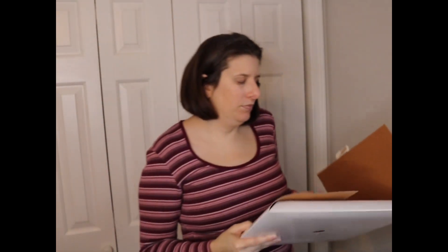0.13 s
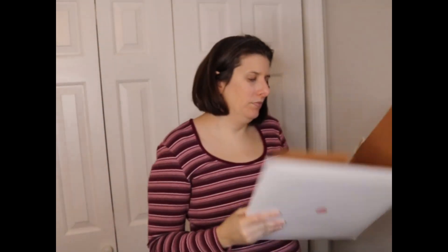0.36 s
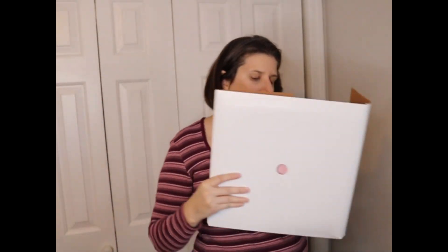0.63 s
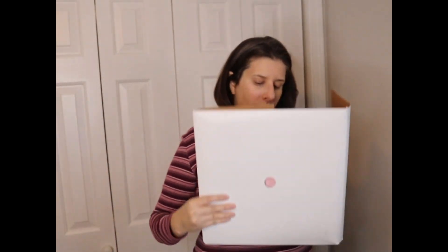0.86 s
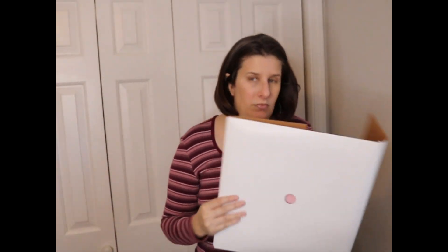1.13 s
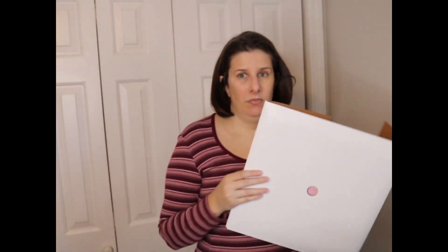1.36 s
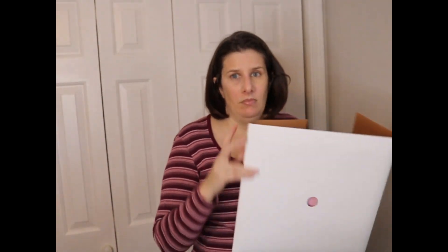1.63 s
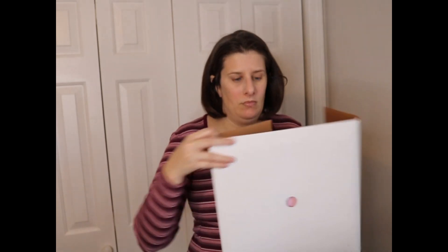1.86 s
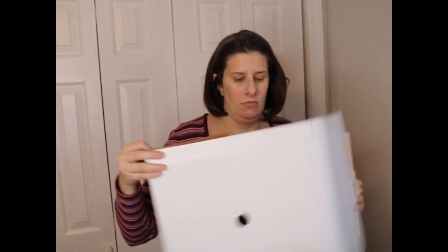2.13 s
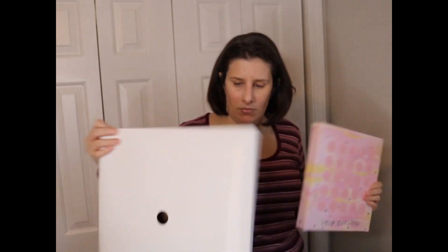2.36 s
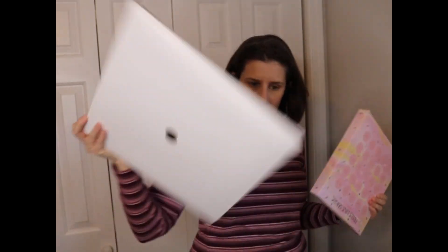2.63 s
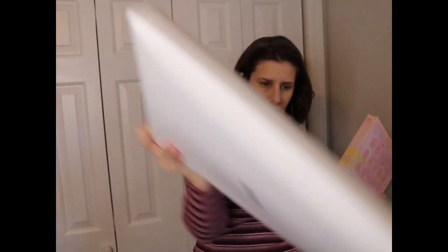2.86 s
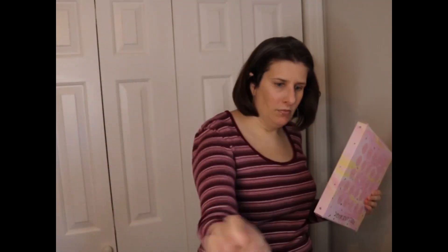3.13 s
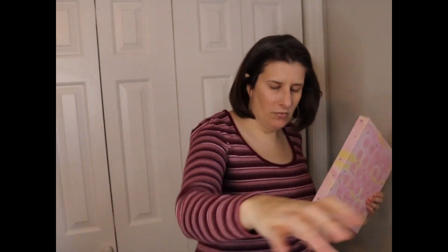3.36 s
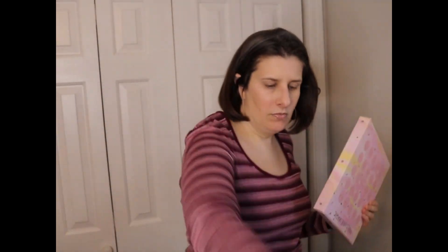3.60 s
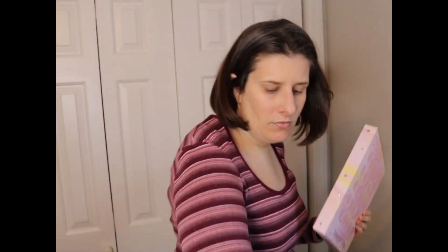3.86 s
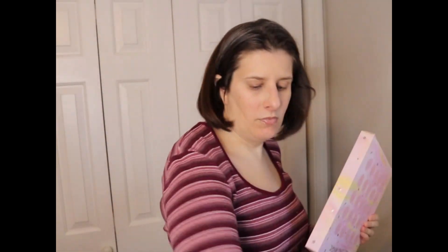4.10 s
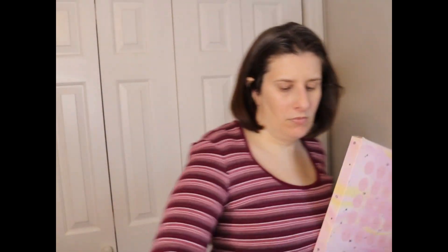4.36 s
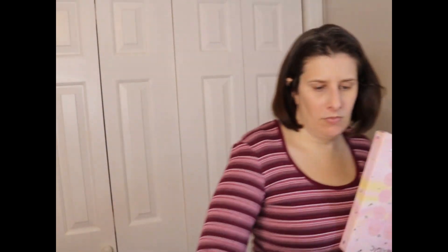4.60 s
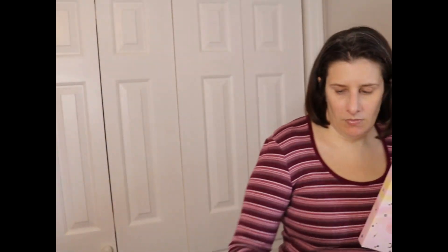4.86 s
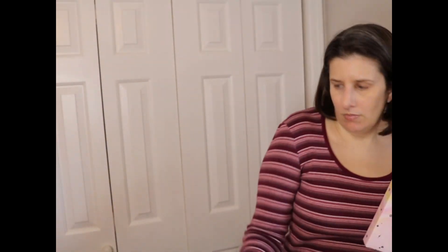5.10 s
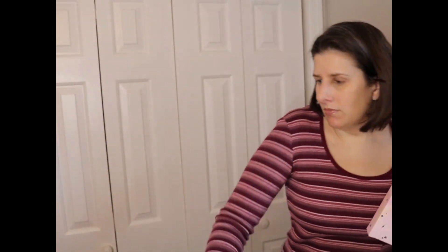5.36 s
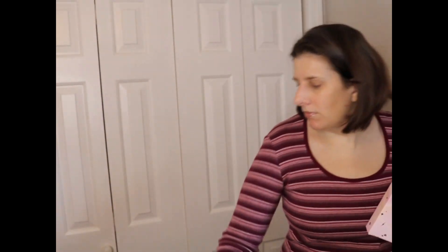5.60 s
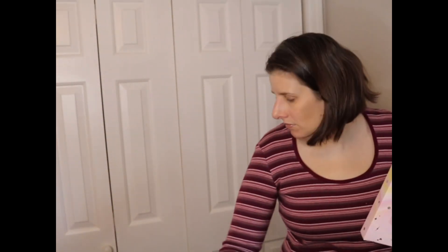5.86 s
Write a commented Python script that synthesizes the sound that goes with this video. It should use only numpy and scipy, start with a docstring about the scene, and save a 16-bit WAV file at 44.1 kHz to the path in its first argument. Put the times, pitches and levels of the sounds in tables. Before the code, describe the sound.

Stiff cardboard slides and scrapes indoors, a boxed set slipping from its sleeve, then hard hollow knocks and low thumps as the pile is shifted.

```python
"""Unpacking a boxed set

Indoors, a boxed set is slid out of a corrugated sleeve, the sleeve is dropped on a pile and the pile is shifted.
Board rubs on board in random stick-slip grains, and filtered noise makes the paper scrape and film hiss.
Flaps and corners knock: short pulses ring the panels and the hollow. Slow slips make the floor boom.
It is heard in a small room, equally loud on both sides, with the phase between them shifted in patches."""
import sys
import numpy as np
from scipy import signal
from scipy.fft import rfft, irfft
from scipy.io import wavfile
from scipy.ndimage import uniform_filter1d

SR = 44100
rng = np.random.default_rng(int(sys.argv[2]) if len(sys.argv) > 2 else 0)


def field_ratio(decibels):
    """Amplitude ratio for a level in dB (20 dB per decade); scalars and array-likes work."""
    return 10 ** (np.asarray(decibels, dtype=float) / 20)


def store_wav(level_fs):
    """Save 16-bit WAV to argv[1]."""
    pcm = np.round(np.clip(np.atleast_2d(level_fs), -1, 1) * 32767)
    wavfile.write(sys.argv[1], SR, pcm.T.astype(np.int16))


N = 263718  # length in samples

# knocks, peak levels before the room: time_s, panels_db, thud_db, crack_db, pitch_hz (of the struck panel)
KNOCK_EVENTS = [(0.121, -34, -44, -31, 1090), (0.171, -35.5, -56, -30, 1320),
                (0.307, -18.5, -36, -20.5, 650), (0.399, -23, -38.5, -27, 640), (0.467, -45, -50, -25, 880),
                (0.551, -22, -36, -32, 684), (0.847, -35, -48, -41, 860), (1.26, -28.5, -41, -26, 770.0),
                (1.361, -16.5, -36, -25.5, 745), (1.92, -22.5, -59, -25, 930.0),
                (1.943, -21.5, -40, -52, 377), (1.965, -19, -28, -29, 1170), (2.172, -26.5, -53, -44, 635),
                (2.194, -18.5, -52, -27, 670), (2.24, -19, -30, -24.5, 910), (2.283, -20, -57, -26, 930),
                (2.353, -24, -25.5, -84, 241), (2.529, -39, -35.5, -46, 430), (2.837, -29, -74, -36.5, 880),
                (3.033, -14.5, -15, -28, 318), (3.067, -14, -53, -55, 990), (3.099, -20.5, -25, -30, 514),
                (3.154, -17.5, -17, -29.5, 510), (3.652, -34.5, -47, -32, 930),
                (3.717, -13, -25.5, -14.5, 623), (3.731, -20, -14.5, -18.5, 670),
                (4.41, -14.5, -21, -24, 593), (4.425, -24, -25, -24, 560), (4.512, -14, -17, -39, 420),
                (5.237, -30, -38.5, -38.5, 935), (5.506, -27, -30.5, -25, 770), (5.707, -26, -20, -44, 270),
                (5.749, -26, -23, -37, 820), (5.778, -26, -26, -28, 1230), (5.814, -22.5, -34, -30, 845)]
# loudness of the floor's boom, with straight lines between rows: time_s, level_db
BOOM_LEVEL = [(0.0, -55.5), (1.863, -87), (1.985, -53.5), (2.386, -45.5), (2.891, -55.5), (3.082, -45.5),
              (3.675, -48.5), (3.93, -28.5), (4.301, -44), (4.458, -28.5), (4.702, -38.5), (4.86, -30),
              (5.207, -48), (5.764, -41), (5.98, -40.5)]
# resonances of the cardboard panels, lowest first: pitch_hz, level_db (relative), t60_s (time to fall 60 dB)
BOARD_MODES = [(249.8, 4, 0.063), (306, 4.5, 0.048), (382.2, 4.5, 0.081), (447.4, 1, 0.041),
               (563, 4, 0.028), (667, 7.5, 0.0077), (770, 7.5, 0.017), (930, 4.5, 0.012), (1134, 6, 0.017),
               (1325, 3.5, 0.0082), (1529, 8.5, 0.0057)]
# resonances of floor and furniture, lowest first: pitch_hz, level_db (relative), t60_s
FLOOR_MODES = [(29.8, -2.5, 0.22), (42.2, 3.5, 0.31), (60, -3, 0.4), (74.7, -3.5, 0.078),
               (113.2, -1.5, 0.13), (165.8, 0, 0.09)]
# tone colour of paper surfaces scraping: frequency_hz, level_db (relative, per Hz)
SCRAPE_COLOUR = [(1200, 10.5), (1900, 0.5), (2700, 2), (4000, -0.5), (5300, -7), (6500, -16)]
# tone colour of hissing plastic film: frequency_hz, level_db (relative, per Hz)
FILM_COLOUR = [(4500, -4), (7000, -7.5), (11000, -9.5), (16000, -18.5)]
# tone colour of the still air: frequency_hz, level_db (relative, per Hz)
AIR_COLOUR = [(25, 7.5), (350, -2), (1050, 1.5), (1800, -11), (4000, -11.5), (16000, -20)]
# phase of left against right, held until the next row:
# start_s, bass_eighth_turns, crossing_hz, upper_eighth_turns (above the crossing)
SIDE_PHASE = [(0.0, -2, 800, 0), (0.28, 2, 950, -3), (1.0, 0, 1600, -3.5), (1.75, 0.5, 1400, 6),
              (2.6, 1, 600, 8), (2.98, 1, 660, 7), (3.17, 1, 500, 7), (3.62, 2.3, 1500, -1.5),
              (4.5, 2, 1000, -.5), (5.1, 2, 330, 7.6), (5.42, -.6, 1900, 8)]
# strokes of board on board:
# start_s, length_s, panels_db, weight_db (hollow sleeve against panels), speed_db (faster sliding scrapes more)
RUB_STROKES = [(-0.03, 0.21, -49.5, -7, 11), (0.409, 0.046, -35.5, -9, 6.5), (0.522, 0.065, -40.5, -3, 7.5),
               (0.615, 0.18, -48, -8, 5), (0.816, 0.042, -43, -9.5, 7.5), (1.035, 0.38, -47.5, -9, 8.5),
               (1.197, 0.086, -39.5, -16, 6), (1.483, 0.31, -54.5, -11.5, 9.5),
               (1.823, 0.17, -49.5, -13, 7), (1.93, 0.2, -35.5, -10.5, 1.5), (2.145, 0.032, -32, -7.5, 3.5),
               (2.227, 0.038, -35, -17, 2), (2.468, 0.21, -49, -10.5, 4), (2.771, 0.012, -41.5, -3.5, 3.5),
               (3.005, 0.27, -44.5, -3.5, 2.5), (3.174, 0.051, -45, 12.5, 11.5), (3.72, 0.2, -38, 2, 6.5),
               (3.871, 0.075, -33.5, 4.5, 7.5), (4.03, 0.076, -47.5, 13, 8), (4.15, 0.093, -44.5, -1, 10.5),
               (4.312, 0.08, -46, 0, 7.5), (4.428, 0.055, -43.5, -8, -1.5), (4.523, 0.06, -45, -9, 4),
               (4.578, 0.24, -50.5, 0.5, 9.5), (4.77, 0.15, -49, 0.5, -0.5), (4.87, 0.41, -53.5, -4.5, 8.5),
               (5.251, 0.4, -52.5, -5, 2.5), (5.472, 0.056, -42.5, -1.5, 6.5),
               (5.775, 0.051, -40, -1.5, -1)]
# film hiss against the scrape, mostly more of it once the wrapped box is out: time_s, share_db
FILM_AGAINST_SCRAPE = [(0, -12.5), (3.0, -8.5), (3.6, -28), (3.72, -6), (4.6, -6), (5.5, -1), (5.75, -8)]


def level(x, db=0):
    """Scale a sound to an rms level in dB."""
    return x * field_ratio(db) / np.sqrt(np.mean(x ** 2))


def colour(x, points):
    """Shape the spectrum by (Hz, dB) points, falling away steeply outside them."""
    hz, db = np.transpose(points)
    log_hz = np.log(np.arange(len(x) // 2 + 1) * SR / len(x) + 1)
    below = np.maximum(np.log(hz[0]) - log_hz, 0)
    above = np.maximum(log_hz - np.log(hz[-1]), 0)
    gain_db = np.interp(log_hz, np.log(hz), db) - 47 * (below + above)
    return irfft(rfft(x) * field_ratio(gain_db), len(x))


def mode(x, hz, t60):
    """One resonance; its gain on noise does not depend on how long it rings."""
    r = np.exp(-np.log(1000) / (t60 * SR))
    feedback = [1, -2 * r * np.cos(2 * np.pi * hz / SR), r * r]
    return np.sqrt(1 - r * r) * signal.lfilter([1, 0, -1], feedback, x)


def ring(x, modes):
    """Let all the resonances of a body ring together, alternating in sign."""
    return sum((-1) ** k * field_ratio(db) * mode(x, hz, t60) for k, (hz, db, t60) in enumerate(modes))


def curve(table):
    """A (seconds, dB) table as a gain for every sample."""
    s, db = np.transpose(table)
    return field_ratio(np.interp(np.arange(N) / SR, s, db))


def slips(per_s, spread_db, smooth, flicker_db, flicker_hz):
    """Stick-slip: random slips of uneven size over smooth sliding, with a random flicker in level."""
    when, sign, size = rng.random((3, N))
    size_db = np.minimum(-spread_db * np.log(1 - size), 12)
    grains = (when < per_s / SR) * np.sign(sign - .5) * field_ratio(size_db)
    hold = int(SR / flicker_hz)
    steps = np.repeat(rng.standard_normal(N // hold + 1), hold)
    flicker = uniform_filter1d(steps, hold)[:N]
    return (level(grains) + smooth * rng.standard_normal(N)) * field_ratio(flicker_db * flicker)


def strokes():
    """Gains of hollow, panels, scrape and film: each stroke swells, holds and dies away; their powers add."""
    attack_s, release_db_per_s = 0.019, 181
    scrape_db = -8.5  # paper scrape against the panels, before the sliding speed
    t, power = np.arange(0, N, 64) / SR, 0
    for s, length_s, db, weight_db, speed_db in RUB_STROKES:
        swell = np.clip((t - s) / attack_s, 0, 1)
        shape = swell * field_ratio(db - release_db_per_s * np.maximum(t - s - length_s, 0))
        balance = field_ratio(np.array([weight_db, 0, scrape_db + speed_db]))
        power = power + np.outer(balance, shape) ** 2
    hollow, panels, scrape = (np.interp(np.arange(N) / SR, t, g) for g in np.sqrt(power))
    return hollow, panels, scrape, scrape * curve(FILM_AGAINST_SCRAPE)


def handling():
    """One sliding contact drives hollow, panels and part of the scrape; finer slips add to the scrape and hiss."""
    hollow, panels, scrape, film = strokes()
    contact = slips(300., spread_db=6., smooth=.5, flicker_db=3.5, flicker_hz=50.)
    fine, fizz = (slips(1500., spread_db=3.5, smooth=0.7, flicker_db=2.5, flicker_hz=30.) for _ in range(2))
    hollow_sound = hollow * level(ring(contact, FLOOR_MODES[4:] + BOARD_MODES[:3]))
    panel_sound = panels * level(ring(contact, BOARD_MODES[3:]))
    scrape_sound = scrape * level(colour(0.56 * contact + fine, SCRAPE_COLOUR))
    film_sound = film * level(colour(fizz, FILM_COLOUR))
    return hollow_sound + panel_sound + scrape_sound + film_sound


def boom():
    """Shifting weight sets the floor's lowest resonances going."""
    steps = slips(60., spread_db=2.5, smooth=.8, flicker_db=1.5, flicker_hz=8.)
    return curve(BOOM_LEVEL) * level(ring(steps, FLOOR_MODES[:4]))


def still_air():
    """The quiet background of the room: steady noise, strongest in the bass."""
    return level(colour(rng.standard_normal(N), AIR_COLOUR), -58)


def knocks():
    """A tap and dying rattle: panels near its pitch ring most, the surface cracks, the hollow thuds."""
    size = 16384
    out = np.zeros(N + size)
    t = np.arange(size) / SR
    # soft board crushes before it bears, then the flaps chatter on
    crush = (t / 0.003) ** 1.4 * np.exp(-t / 0.0036)
    chatter = 0.15 * (1 - np.exp(-t / 0.003)) * np.exp(-t / 0.025)
    # shut in air lets the hollow ring on longer than when it is rubbed
    hollow = [(hz, db, 1.3 * t60) for hz, db, t60 in FLOOR_MODES[3:] + BOARD_MODES[:1]]
    push = np.exp(-((t - .004) / 0.00058) ** 2 / 2)
    for s, peak_db, thud_db, crack_db, pitch_hz in KNOCK_EVENTS:
        contact = rng.standard_normal(size) * (crush + chatter)
        # the tap lasts a fraction of the struck panel's period
        tap = np.exp(-((t - .004) * pitch_hz / 0.2) ** 2 / 2)
        # each knock's panel pitches vary at random by about 4 percent
        vary = 1 + .04 * rng.standard_normal(len(BOARD_MODES))
        # panels lose 16 dB for each octave away from the knock's pitch
        struck = [(hz * v, db - 16 * abs(np.log2(hz / pitch_hz)), t60)
                  for (hz, db, t60), v in zip(BOARD_MODES, vary)]
        panels = ring(contact + tap, struck)
        crack = colour(contact, SCRAPE_COLOUR) + field_ratio(-33.0) * colour(contact, FILM_COLOUR)
        thud = ring(push + 2.5 * contact, hollow)
        i = max(int((s - .0025) * SR), 0)  # the pulse builds up from just before the listed time
        for part, db in ((panels, peak_db), (crack, crack_db), (thud, thud_db)):
            out[i:i + size] += part * field_ratio(db) / np.abs(part).max()
    return out[:N]


def room(x):
    """Close walls: a dense echo tail, duller as it fades because its treble dies faster."""
    t60_s, tail_db = 0.37, -10
    t = np.arange(int(.4 * SR)) / SR
    dull, bright = rng.standard_normal((2, len(t)))
    tail = uniform_filter1d(dull, size=8) * field_ratio(-60 * t / t60_s)
    tail = tail + 0.6 * bright * field_ratio(-100 * t / t60_s)
    tail = tail * (t > .004)  # no echo in the first 4 ms
    tail = tail / np.sqrt(np.sum(tail ** 2))
    return x + field_ratio(tail_db) * signal.fftconvolve(x, tail)[:N]


def shift_phase(x):
    """One sound on both sides; their phase differs in eighth turns, in flat random patches in the treble."""
    hz, s, spec = signal.stft(x, SR, nperseg=1024, noverlap=768)
    pitch = hz[:, None]
    start, bass, cross_hz, above = np.transpose(SIDE_PHASE)
    row = np.searchsorted(start, s, side="right") - 1
    # eight smooth random maps over pitch and time, slightly roughened
    blur = np.outer(np.hanning(15), np.hanning(20))[None]
    noise = rng.standard_normal((8, len(hz), len(s) // 4 + 1))
    fields = signal.fftconvolve(noise, blur, "same", axes=(1, 2))
    fields = np.repeat(fields / fields.std(), 4, axis=2)[..., :len(s)]
    fields = fields + .3 * rng.random((8,) + spec.shape)
    # cross from the bass phase to the upper phase within one octave
    octaves = np.clip(np.log2((pitch + 1) / cross_hz[row]), -.5, .5)
    lead = bass[row] + (above - bass)[row] * (.5 + 4 * octaves ** 3)
    jitter = fields[0] * np.interp(hz, [500, 2200], [.2, .7])[:, None]
    lead = np.round(lead + jitter)
    # above a ragged border near 2700 Hz, the strongest map picks the eighth turn
    eighths = np.where(pitch + 400 * fields[1] < 2700, lead, fields.argmax(axis=0))
    # the tiny offset makes every half turn fall on the same side
    phase = np.angle(np.exp(1j * (eighths * np.pi / 4 - 1e-6)))
    sides = [spec * np.exp(side * .5j * phase) for side in (1, -1)]
    return np.array([signal.istft(side, SR, nperseg=1024, noverlap=768)[1][:N] for side in sides])


def scene():
    """Handling and knocks in the room, over the floor's boom and still air, phase-shifted left against right."""
    in_room = room(handling() + knocks())
    return shift_phase(in_room + boom() + still_air())


def low_pass(x):
    """Removes everything above the highest recorded frequency."""
    return signal.sosfilt(signal.butter(12, 15740, fs=SR, output="sos"), x)


def record(dry):
    """Turn the finished mix into the sound to be saved."""
    return low_pass(dry)


dry = scene()
out = record(dry)
store_wav(out)
```